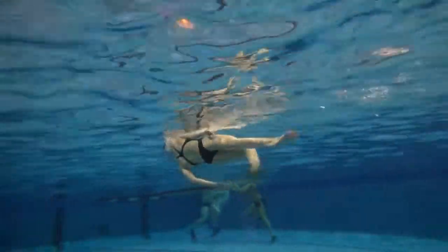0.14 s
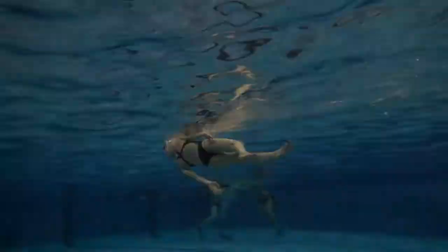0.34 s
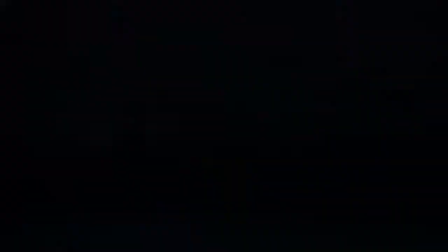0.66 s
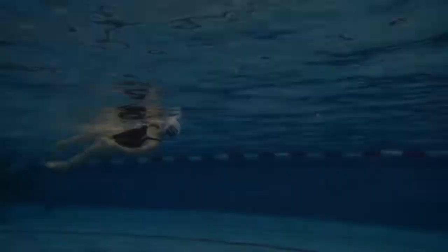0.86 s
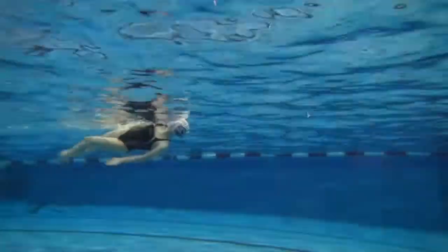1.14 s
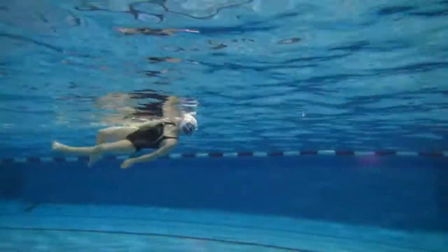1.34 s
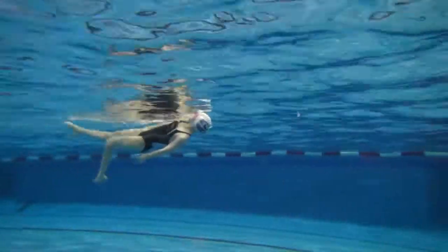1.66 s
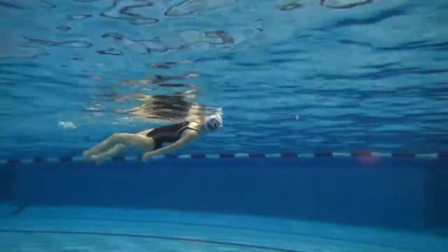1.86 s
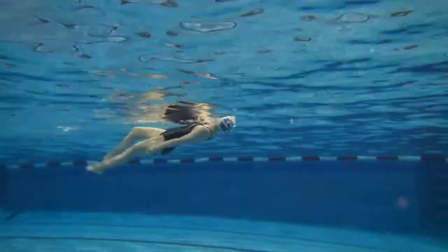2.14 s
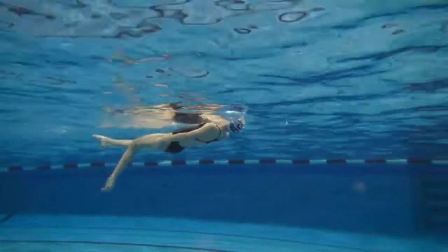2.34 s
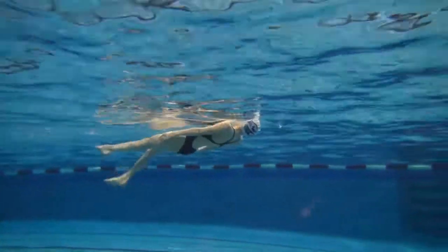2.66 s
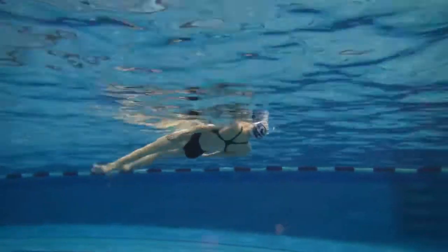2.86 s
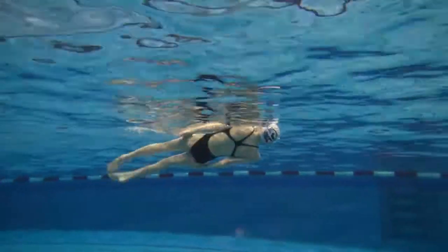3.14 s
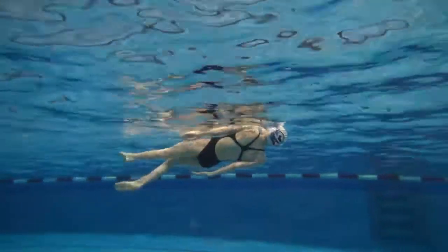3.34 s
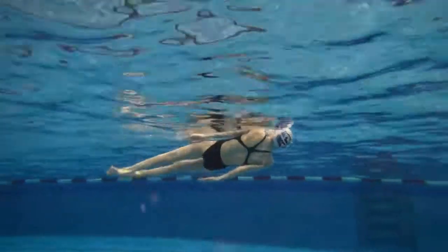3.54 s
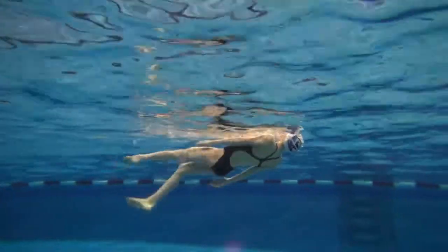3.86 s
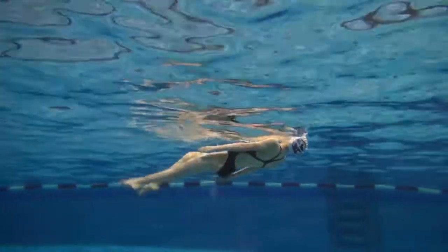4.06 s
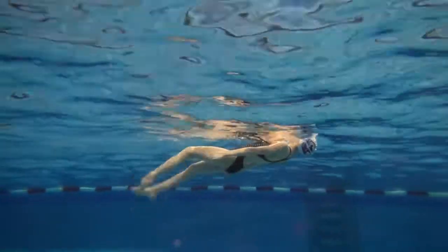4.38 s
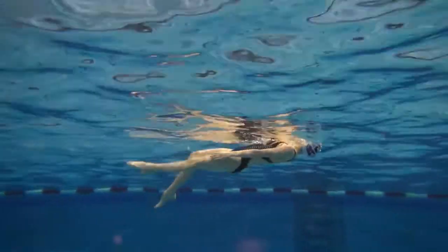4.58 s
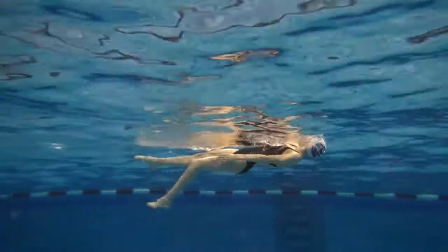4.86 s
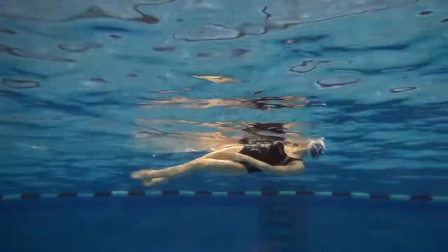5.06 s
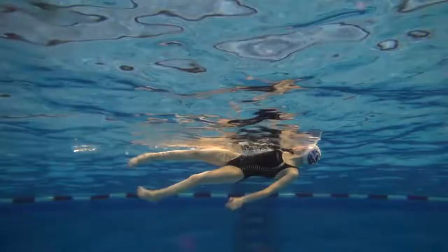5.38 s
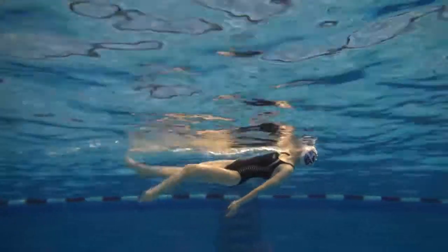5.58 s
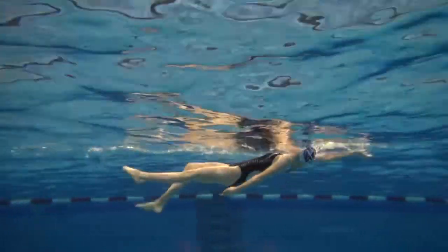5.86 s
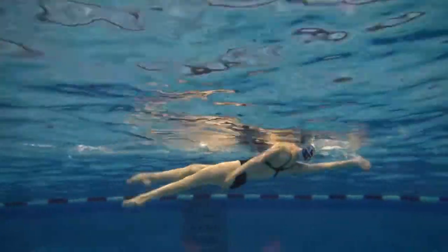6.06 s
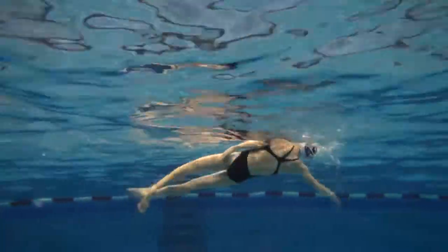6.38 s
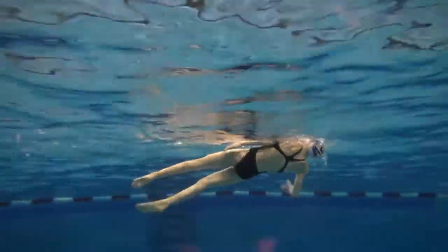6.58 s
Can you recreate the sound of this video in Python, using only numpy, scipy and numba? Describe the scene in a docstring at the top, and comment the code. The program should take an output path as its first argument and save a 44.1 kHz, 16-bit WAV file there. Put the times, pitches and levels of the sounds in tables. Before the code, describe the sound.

Close underwater gurgling and bubbling around a swimmer in a pool, with hollow plops, dull knocks, sharp crackling snaps and muffled splashes behind.

```python
"""Swimmer passing an underwater camera

In a pool, air pockets gulp close beside the housing as gliding, wavering sine notes. Ringing bubbles and noise churn
along its left side. Slaps push the case, ring the air they trap and burst into foam; the recorder snaps and crackles
on peaks. Behind lie shaped noise and droplets for the muffled splashing of kicks and hands, slow eddies and a faint
camera whine. The left microphone is nearer most sounds; a fast compressor and a limiter duck everything after peaks."""
import sys
import numpy as np
from scipy import signal
from scipy.fft import rfft, irfft, next_fast_len
from scipy.io import wavfile
from scipy.ndimage import uniform_filter1d, map_coordinates
from numba import njit

SR = 44100
rng = np.random.default_rng(int(sys.argv[2]) if len(sys.argv) > 2 else 0)


def digitize_waveform(pressure):
    """Quantize a signal to 16-bit integers and store it at the path in sys.argv[1].

    Rows of a 2-D input are taken as channels; values are limited to [-1, 1].
    """
    field = np.atleast_2d(pressure).T
    bounded = np.clip(field, -1, 1)
    quanta = np.round(bounded * 32767).astype(np.int16)
    wavfile.write(sys.argv[1], SR, quanta)


N = 295911  # length in samples

# Air pockets that ring beside the case. Each row: start in seconds, length in seconds, first pitch in Hz,
# last pitch in Hz, relative level in dB.
AIR_POCKETS = [(0, 0.0486, 348, 354, -31.5), (0, 0.046, 254, 255, -33), (0.194, .052, 361, 340, -24),
               (.447, .034, 437, 422, -22.5), (0.467, .1, 119.9, 98, -16.5), (.562, 0.08, 79, 67, -16.5),
               (0.588, .087, 448, 400, -26.5), (.66, .11, 81.2, 77.2, -24.5),
               (.715, 0.054, 349, 355, -10.5), (.72, 0.082, 260.4, 243.8, -11),
               (0.729, .15, 201, 201.7, -15.5), (0.814, 0.055, 401.5, 444, -16),
               (.865, .06, 403, 398, -18.5), (0.869, .06, 349, 339, -15), (0.904, .12, 311.7, 309.3, -20.5),
               (.915, 0.025, 747, 770, -12.5), (.94, .075, 215.5, 203, -9.5),
               (0.953, 0.077, 348.6, 356, -12.5), (1.012, .045, 187.5, 163.6, -10.5),
               (1.055, 0.044, 614, 586, -18.5), (1.06, 0.14, 158.3, 158.2, -12),
               (1.114, .06, 256.2, 265, -11), (1.12, .12, 365.4, 342, -17), (1.131, 0.071, 538, 532, -21.5),
               (1.137, 0.055, 857, 878, -27), (1.19, .12, 158.4, 154.3, -10), (1.187, .09, 243, 248, -9),
               (1.269, .06, 721, 690, -21.5), (1.279, .058, 260, 262, -1), (1.3, 0.11, 130.3, 134.6, -16.5),
               (1.37, .05, 718, 729, -19), (1.375, .1, 276, 269, -8), (1.41, .15, 183.1, 192.3, -13.5),
               (1.46, .14, 156.6, 150.6, -14.5), (1.47, .09, 269.7, 264.6, -15.5),
               (1.497, .12, 111, 121.7, -23.5), (1.54, .11, 237.8, 238.4, -11.5),
               (1.59, 0.12, 191.2, 195.3, -13), (1.6, .1, 149.9, 163.9, -11),
               (1.662, .065, 241.7, 251.7, -6.5), (1.69, 0.08, 160.1, 170.2, -20.5),
               (1.726, .078, 269.6, 261.7, -8), (1.829, 0.098, 259, 254.4, -11),
               (1.83, 0.14, 191, 210.5, -21), (1.95, .1, 393.4, 449.3, -20),
               (1.977, 0.087, 270, 277.7, -14.5), (2.0, .08, 221.4, 241.7, -14.5),
               (2.046, 0.22, 367, 370.2, -20.5), (2.058, .065, 255.4, 263.3, -6),
               (2.139, 0.042, 275, 290.6, -13), (2.233, 0.18, 345, 355, -23.5),
               (2.255, 0.053, 205.5, 201, -17), (2.455, 0.044, 208.7, 210.6, -13.5),
               (2.856, 0.055, 209.5, 218, -18), (2.926, .045, 252, 257, -13.5),
               (3.025, 0.053, 269.5, 268, -23), (3.13, 0.05, 306, 310, -17), (3.177, .07, 265, 272, -12.5),
               (3.358, 0.17, 652.3, 636, -28), (3.5, .05, 700, 660, -21), (3.38, .2, 146, 150.2, -26),
               (3.76, 0.14, 266.8, 270, -23.5), (3.85, .3, 148.4, 148.4, -25.5),
               (3.994, .1, 651.6, 670, -24.5), (4.024, .09, 270.6, 272, -16),
               (4.123, 0.045, 367.4, 384, -17.5), (4.202, .09, 695, 708, -18),
               (4.216, .11, 278.5, 264.5, -16.5), (4.358, .045, 268.4, 267, -18),
               (4.602, .115, 365, 352, -10.5), (4.64, .08, 207, 194.5, -11), (4.91, .11, 86, 107, -21),
               (5.161, .075, 282.6, 258, -20), (5.272, 0.045, 238, 265.4, 2),
               (5.988, .065, 693.4, 655, -16), (6.125, .04, 253, 257, -15), (6.48, 0.074, 853, 775, -19)]
POCKET_WAVER_OCT = .012  # unsteadiness of the pitch, in octaves
POCKET_EDGE_S = .014  # a pocket swells, and breaks off, within this time

# Bubbles streaming past the case. Each row: time in seconds, relative level of large bubbles in dB, of small ones in dB.
BUBBLE_FLOW = [(0, -75, -45), (.22, -53.5, -68), (.36, -40.5, -50.5), (.85, -31, -41.5), (1.22, -34, -37),
               (1.55, -39, -52), (1.75, -37.5, -50.5), (1.9, -34.5, -45), (2.15, -37.5, -46.5),
               (2.42, -35, -38.5), (3.05, -36, -35.5), (3.35, -39.5, -41.5), (4.15, -31, -36),
               (4.4, -35.5, -38.5), (4.65, -32, -31.5), (4.8, -35, -38), (4.87, -37, -38.5),
               (4.95, -34, -35.5), (5.6, -35, -34.5), (6.301, -38.5, -33), (6.71, -29.5, -33.5)]
LUMP_DB, LUMPS_PER_S = 1.5, 16  # the stream of bubbles is lumpy
# Colours of the large and the small bubbles through the case. Each row: frequency in Hz, relative gain in dB.
LARGE_COLOUR = [(70, -40.5), (125, -6), (155, -3.5), (180, -2.5), (215, 2.5), (238, -8), (268, 6.5),
                (305, -9.5), (335, 0), (366, 2.5), (410, -2), (510, -6), (700, -24), (1500, -100)]
SMALL_COLOUR = [(300, -25), (500, -16), (592, 2), (625, -17), (650, 2.5), (700, -1.5), (770, -1.5),
                (900, -16), (1060, -22.5), (1300, -30), (2000, -49.5), (3000, -47.5), (5000, -61),
                (12000, -105)]

# Water slapping the case. Each row: start in seconds, ring pitch in Hz, relative ring level in dB,
# relative push level in dB.
CASE_SLAPS = [(.404, 162.2, -27, -10.5), (.569, 242.3, -20.5, -14), (.595, 361, -20.5, -12.5),
              (.627, 402, -12, -11.5), (.663, 345.4, -13, -15), (.72, 549, -12.5, -9.5),
              (.73, 264, -8, -7.5), (.739, 329.6, -2.5, -12), (0.75, 343.5, -9.5, -13),
              (.778, 230, -7, -17.5), (.924, 751, -11.5, -13), (.978, 377, -9, -9), (1.058, 572, -7, -4.5),
              (1.135, 533, -16, -12.5), (1.297, 716, -14, -19.5), (1.373, 707, -11.5, -4.5),
              (1.423, 291, -6, -5), (1.68, 172.3, -16.5, -9.5), (1.821, 450, -13, -17),
              (1.87, 273.7, -11, -10), (2.087, 295, -7.5, -10.5), (2.242, 787, -17.5, -27.5),
              (2.297, 569, -11.5, -28.5), (2.699, 691, -8, -6), (2.795, 453, -2, -12.5),
              (3.001, 703, -14.5, -26), (3.107, 687, -17, -25), (3.184, 280.8, -2.5, -14.5),
              (3.587, 750, 4, -4.5), (3.648, 667, -9.5, -29), (3.948, 694, -10.5, -27),
              (4.112, 427, -15, -12.5), (4.485, 626, -7.5, -15.5), (4.594, 737, 12.5, 6.5),
              (4.631, 346.5, 4, -6.5), (4.651, 366.4, 0, -15.5), (4.81, 678, 9.5, 2.5),
              (4.817, 473.5, 2, 4), (4.823, 598, 2.5, 6), (4.908, 635, -11.5, -30), (4.99, 608, -4, -17),
              (5.088, 559, -9.5, -24), (5.271, 260, 8, 8.5), (5.351, 348, -9, -7.5),
              (5.433, 730, -24.5, -22.5), (5.449, 655, -13.5, -23), (5.544, 780, -11, -27),
              (5.576, 773, -3.5, -17), (5.601, 532, -6, -14.5), (5.833, 683, -9.5, -11.5),
              (5.941, 623, -4.5, -23.5), (6.055, 241.4, -14, -10.5), (6.207, 736, -11, -23),
              (6.389, 682, -3.5, -24.5), (6.461, 728, -6.5, -25), (6.54, 717, -7.5, -34.5),
              (6.6, 383, -6.5, -26.5)]
RING_CYCLES = 41  # cycles that the trapped air rings until it is 60 dB down
# Bubbles that split off the trapped air: level of each over the ring, spread of pitch in octaves, spread of delay.
SPLINTER_DB, SPLINTER_OCT, SPLINTER_S = -8, .3, .005
RUSH_DB, RUSH_S = -16.5, 0.0064  # water rushes in just before a slap: level over the foam burst, rise time
# Colour of the foam in a slap. Each row: frequency in Hz, relative gain in dB.
FOAM_COLOUR = [(100, -3), (350, 3.5), (750, 4), (1100, 0), (1500, -12), (2500, -26), (4000, -37.5),
               (8000, -54), (15000, -78)]
# The case muffles the ring of trapped air. Each row: frequency in Hz, gain in dB.
CASE_MUFFLING = [(100, 0.5), (800, 0), (1100, -1.5), (1500, -17.5), (4000, -31.5)]

# Sharp dry clicks as the recorder's limiter grabs loud peaks, often several to a slap. Each row: time in seconds,
# relative level in dB, brightness in dB per octave.
RECORDER_SNAPS = [(.401, -25, 0), (0.4059, -13, 3), (.569, -28.5, 2.5), (.595, -30, -1), (0.628, -26, 1.5),
                  (.663, -28.5, 0), (0.7219, -25.5, -3), (.726, -19.5, 0.5), (.731, -16.5, 2),
                  (.7395, -8, 0), (0.743, -21, -2), (0.747, -23.5, -0.5), (.753, -23, 0), (.778, -19, -5.5),
                  (.792, -24, 4.5), (0.795, -27, 4), (0.9265, -16.5, -1), (0.931, -24, 0), (.937, -24, -3),
                  (.979, -24.5, 0), (1.053, -25.5, 6.5), (1.0586, -20, 1.5), (1.063, -22.5, -2),
                  (1.133, -23.5, 2), (1.138, -23, 1.5), (1.297, -18, -1), (1.3736, -11.5, -1.5),
                  (1.385, -28.5, -4), (1.4225, -17.5, 0), (1.425, -24.5, 3), (1.822, -26, -2.5),
                  (1.8724, -19, -4.5), (2.018, -28.5, 0), (2.0889, -21, 0.5), (2.696, -26, 2.5),
                  (2.701, -15, -2.5), (2.702, -22.5, -0.5), (2.793, -29, -0.5), (2.803, -25, -2.5),
                  (3.036, -20, -4.5), (3.186, -17.5, -0.5), (3.199, -26.5, 3), (3.582, -24, 3.5),
                  (3.5863, -15, -0.5), (3.589, -6, 2.5), (3.595, -20.5, -3), (3.954, -29.5, 3),
                  (4.113, -21.5, -3.5), (4.144, -32.5, 0), (4.164, -26, -5.5), (4.235, -26.5, -2),
                  (4.271, -27.5, 0.5), (4.493, -22, 3), (4.589, -30.5, 7.5), (4.596, -1, 1),
                  (4.5965, 6.5, -5), (4.598, 8, -3.5), (4.599, 2, -1.5), (4.627, -24.5, 7),
                  (4.63, -4.5, -3.5), (4.636, -20, -0.5), (4.65, -14, -4), (4.663, -17.5, 1),
                  (4.809, -20, -3), (4.8128, -11.5, 3.5), (4.815, -9, 0), (4.8252, -12, 1.5),
                  (4.826, -14.5, -1.5), (4.989, -25, 0.5), (4.99, -26.5, 2), (5.204, -29.5, 0.5),
                  (5.267, -25.5, 2.5), (5.268, -20, -0.5), (5.272, 8.5, 0), (5.351, -31, -4.5),
                  (5.435, -20.5, -9), (5.575, -17, -4.5), (5.597, -21, 5.5), (5.602, -22.5, 3.5),
                  (5.847, -23.5, -4.5), (5.944, -18.5, -1.5), (5.949, -21, -2.5), (6.056, -19, 6),
                  (6.391, -19.5, 1), (6.533, -28, 3.5), (6.6, -18.5, -1), (6.618, -24, -1)]
SNAP_S, SNAP_PIVOT_HZ = .00019, 4000  # time constant; the pitch about which the brightness tilts
# Colour of a snap. Each row: frequency in Hz, relative gain in dB.
SNAP_COLOUR = [(300, -7.5), (1200, 13.5), (2500, 5), (4000, -4.5), (6000, -11), (9000, -17), (15000, -28)]

# Spans where the recorder's compressor ticks on more pressure crests. Each row: start in seconds, length in seconds,
# share of the crests that tick.
TICK_SPANS = [(0.83, .26, .4), (1.112, 0.19, .6), (1.505, .2, .35), (1.732, 0.051, .6), (1.95, 0.24, .35),
              (4.099, .22, .3), (4.61, .1, .7)]
CALM_SHARE = 0.18  # share of the crests that tick between these spans
TICK_DB, TICK_SPREAD_DB = -24, 3  # relative level of the ticks and its random spread
CREST_LIMIT = 0.19  # crest of pressure at which the ticks stop growing
# Colour of a fine dry tick. Each row: frequency in Hz, relative gain in dB.
TICK_COLOUR = [(500, -15), (1300, -2), (2500, -6), (4000, -12.5), (6000, -18), (9000, -25), (15000, -45.5)]

# Kicks and hands breaking the surface. Each row: time of the crest in seconds, relative level in dB.
SURFACE_SPLASHES = [(2.343, -41.5), (2.596, -37), (2.801, -28), (2.995, -34.5), (3.13, -38.5), (3.197, -36),
                    (3.489, -32.5), (3.649, -38), (3.794, -43.5), (3.872, -34), (3.95, -31.5),
                    (4.059, -39.5), (4.165, -38.5), (4.259, -37), (4.364, -37.5), (4.44, -39), (4.51, -34),
                    (4.969, -36.5), (5.18, -41.5), (5.559, -39.0), (5.732, -35.5), (5.858, -36.5),
                    (6.048, -44), (6.112, -42.5), (6.212, -31.5), (6.311, -35.5), (6.45, -39),
                    (6.535, -43.5), (6.601, -32.5), (6.661, -38.5)]
SPLASH_RISE_S, SPLASH_FALL_S = 0.0099, 0.012  # a splash swells and sinks
# Colour of a splash. Each row: frequency in Hz, relative gain in dB.
SPLASH_COLOUR = [(300, -24), (700, -6), (900, -2.5), (1070, 11), (1200, -6), (1400, -26.5), (2000, -22.5),
                 (2800, -38.5), (6000, -64.5)]

# Broken water at the surface. Each row: time in seconds, relative wash level in dB, relative spray level in dB.
SURFACE_WATER = [(0, -54, -66.5), (.4, -54, -67), (.95, -54, -68.5), (1.4, -60.5, -86.5), (1.8, -59, -78.5),
                 (2.05, -52, -70.5), (2.55, -47, -63.5), (2.85, -38, -65), (3.3, -46, -67.5),
                 (3.9, -44.5, -64.5), (4.55, -42, -59.5), (4.8, -40.5, -61.5), (4.85, -50, -71),
                 (4.9, -40.5, -59.5), (5.3, -46, -61.5), (5.85, -43, -58.5), (6.3, -42.5, -63.5),
                 (6.71, -43.5, -59)]
SURGE_DB, SURGES_PER_S = 2, 22  # the wash comes in quick uneven surges
SPRAY_SURGE_DB, SPRAY_SURGES_PER_S = 2, 18  # the spray flutters more slowly
FIZZ_DB, FIZZ_SPREAD_DB = -4, 5.5  # droplets within the spray: relative level, spread of strength
# Colours of the wash at the left and right microphone, of the spray and of its droplets.
# Each row: frequency in Hz, relative gain in dB.
WASH_LEFT_COLOUR = [(25, 7), (90, -14), (125, -3), (148, 12), (180, -4), (212, 6), (238, -2.5), (268, 7),
                    (305, -3.5), (366, 0), (410, -2.5), (465, -0.5), (505, -6), (590, -3.5), (700, -2),
                    (800, -11.5), (1080, -5), (1400, -48.5), (2500, -59.5), (6000, -100)]
WASH_RIGHT_COLOUR = [(25, 0.5), (110, -1.5), (260, 2.5), (305, -17.5), (355, 6), (460, -19), (700, -1.5),
                     (900, -16.5), (1070, 5.5), (1180, -7), (1350, -27), (2500, -37.5), (6000, -100)]
SPRAY_COLOUR = [(600, -21.5), (1300, 6), (1620, -2), (1800, -2), (2000, 0), (2400, -13), (2750, -9),
                (3350, -17.5), (3700, -19.5), (5000, -25.5), (7500, -32.5), (9000, -41), (15500, -55)]
FIZZ_COLOUR = [(500, -12), (1300, 6.5), (2500, -4.5), (4000, -10.5), (6000, -25.5), (9000, -28.5),
               (15000, -37)]

# Sheets of spray thrown by arms and feet. Each row: start in seconds, length in seconds, centre in Hz, width in Hz,
# relative level in dB.
SPRAY_SHEETS = [(0, 0.87, 850, 620, -47.5), (0, 0.22, 1893, 1100, -58), (0, 1, 2840, 800, -73.5),
                (0.072, 0.14, 1480, 420, -57), (0.202, 0.66, 1840, 996, -59.5),
                (2.538, 0.054, 2410, 2580, -58.5), (4.432, 0.029, 2500, 2410, -49),
                (4.46, 0.033, 2200, 1770, -49.5), (5.68, 1.0, 1580, 170, -53.5)]

# Slow eddies against the case. Each row: time in seconds, relative rumble level in dB.
EDDY_RUMBLE = [(0, -53), (.2, -61), (.45, -44.5), (1.35, -47), (1.65, -56), (2.25, -61), (2.7, -43.5),
               (3.7, -46.5), (4.4, -46.5), (5.2, -44.5), (5.9, -47.5), (6.4, -45), (6.71, -59)]
EDDY_SWELL_DB, EDDY_SWELLS_PER_S = 5, 5.6  # the rumble swells and sinks
WAKE_DB, WAKE_S = -34.5, 0.0076  # eddy left by a slap: level over its push, time to die away
# Colour of the rumble through the case. Each row: frequency in Hz, relative gain in dB.
RUMBLE_COLOUR = [(12, -6.5), (30, 10), (60, 5), (100, 5), (150, -17), (300, -57.5), (600, -120)]

# Faint whine of the camera. Each row: time in seconds, lower pitch in Hz, upper pitch in Hz.
CAMERA_WHINE = [(0, 7800, 11070), (.65, 7800, 11000), (.9, 7600, 11680), (1.7, 7500, 11700),
                (2.1, 7500, 11300), (6.71, 7250, 11230)]
WHINE_DB, WHINE_WAVER_HZ = -97, 55  # level of each tone, unsteadiness of its pitch
FLOOR_DB = -83.5  # hiss of the camera

# Colour of both microphones. Each row: frequency in Hz, gain in dB.
MICROPHONE_COLOUR = [(20, -6), (2500, 0.5), (5000, 0), (9000, 0), (15000, 4)]
TOP_HZ = 15800  # nothing passes above this
LIMIT_DB = -11  # threshold of the limiter
FADE_S = .004  # fade at both ends


def gulps():
    """Each large air pocket swells into a low, slightly unsteady note and breaks off."""
    out = np.zeros(N)
    for s, length, first_hz, last_hz, db in AIR_POCKETS:
        u = np.linspace(0, 1, int(length * SR))
        glide = first_hz + (last_hz - first_hz) * u
        pitch = glide * 2 ** (POCKET_WAVER_OCT * wobble(56, len(u)))
        edge = np.minimum(np.minimum(u, 1 - u) * length / POCKET_EDGE_S, 1)
        swell = np.sin(np.pi / 2 * edge) ** 2 * amp(db + 1.8 * wobble(27, len(u)))
        add(out, s, swell * np.sin(2 * np.pi * np.cumsum(pitch) / SR))
    return from_left(amp(-4.5) * out, right_db=-15.5)


def churn():
    """Bubbles of two sizes, ringing amid noise, stream along the left side of the case."""
    large_db, small_db = [db + LUMP_DB * wobble(LUMPS_PER_S, N) for db in curves(BUBBLE_FLOW)]
    large = bubbles(121.2, 543, cycles=36, spread_db=-1.0, rise=0.054, count=2000)
    large = coloured(large + 0.1 * rng.standard_normal(N), LARGE_COLOUR)
    small = bubbles(457, 1396, cycles=63, spread_db=2.0, rise=0.012, count=2400)
    small = coloured(small + 1.7 * rng.standard_normal(N), SMALL_COLOUR)
    large_stream = from_left(amp(large_db + 9.5) * large, right_db=-18.5)
    small_stream = from_left(amp(small_db + 8) * small, right_db=-27.5)
    return large_stream + small_stream


def bubbles(low_hz, high_hz, cycles, spread_db, rise, count):
    """A cloud of bubbles: each rings for some cycles while its pitch rises."""
    when, pitch, size, life = rng.random((count, 4)).T[:, :, None]
    t = np.arange(SR // 16) / SR
    hz = low_hz * (high_hz / low_hz) ** pitch
    age = t * hz / (cycles * (.5 + life))
    phase = 2 * np.pi * hz * t * (1 + rise * np.minimum(age, 1))
    ring = np.sin(phase) * amp(-60 * age) * (1 - np.exp(-2 * hz * t))
    strength = amp(-spread_db * np.log(1 - .97 * size)) * np.sqrt(hz)
    ring *= strength * (1 - t / t[-1])
    at = (when * N).astype(int) + np.arange(len(t))
    return unit(np.bincount(at.ravel(), ring.ravel(), N)[:N])


def slaps():
    """A slap is a soft push on the whole case, the ring of the air it traps and splinters, and a ragged foam burst."""
    rings, pushes, foam = np.zeros((3, N))
    t = np.arange(SR // 6) / SR
    before = t[:SR // 20]
    for s, hz, ring_db, push_db in CASE_SLAPS:
        splinters = np.zeros(len(t))
        for delay, pitch in rng.standard_normal((4, 2)):
            splinters += trapped_air(t - SPLINTER_S * abs(delay), hz * 2 ** (SPLINTER_OCT * pitch))
        add(rings, s, amp(ring_db) * (trapped_air(t, hz) + amp(SPLINTER_DB) * splinters))
        fall = amp(ring_db - 60 * t * hz / RING_CYCLES) * np.exp(-t / 0.025)
        add(foam, s, fall * (1 - np.exp(-t / 0.00015)))
        rush = amp(ring_db + RUSH_DB) * np.exp(-before[::-1] / RUSH_S)
        add(foam, max(s - before[-1], 0), rush)
        u = t / 0.00056
        add(pushes, s, amp(push_db) * u * u * (3 - u) * np.exp(-u))
    foam_noise = coloured(rng.standard_normal((2, N)), FOAM_COLOUR)
    burst = amp(-20.0) * foam * foam_noise * amp([[0], [-6]])
    muffled = filtered(rings, lambda hz: along(CASE_MUFFLING, hz))
    return from_left(amp(-5.0) * muffled, right_db=-24.0) + from_left(pushes, right_db=-8.0) + burst


def trapped_air(t, hz):
    """A trapped bubble of strength 1 rings from t = 0 on and dies away over a set number of cycles."""
    t = np.maximum(t, 0)
    return amp(-60 * t * hz / RING_CYCLES) * (1 - np.exp(-t / 0.00029)) * np.sin(2 * np.pi * hz * t)


def recorder_snaps():
    """Each grab of the recorder's limiter is a very short ragged crack of noise, with a colour of its own."""
    out, size = np.zeros(N), SR // 80
    t, hz = np.arange(size) / SR, np.fft.rfftfreq(size, 1 / SR)
    age = np.maximum(t - t[-1] / 2, 0) / SNAP_S
    octaves = np.log2(np.maximum(hz, SNAP_PIVOT_HZ / 4) / SNAP_PIVOT_HZ)
    for s, db, brightness in RECORDER_SNAPS:
        crack = rng.standard_normal(size) * age * np.exp(-age)
        colour = along(SNAP_COLOUR, hz) * amp(db + brightness * octaves)
        add(out, s - t[-1] / 2, irfft(rfft(crack / np.linalg.norm(crack)) * colour, size))
    return from_left(out, right_db=-23.0)


def recorder_ticks(water):
    """Some pressure crests make the recorder's compressor tick: fine dry ticks with silence between them."""
    crests = signal.find_peaks(water[0], distance=SR // 400)[0]
    spread_db = TICK_SPREAD_DB * np.clip(rng.standard_normal(N), -2, 2)
    strength = (rng.random(N) < tick_chance()) * amp(TICK_DB + spread_db)
    ticks = np.zeros(N)
    ticks[crests] = np.clip(water[0, crests] / CREST_LIMIT, 0, 1) ** 2 * strength[crests]
    return from_left(filtered(ticks, lambda hz: along(TICK_COLOUR, hz)), right_db=-25.5)


def tick_chance():
    """Chance that a crest of pressure makes a tick, set anew within each of the listed spans."""
    chance = np.full(N, CALM_SHARE)
    for s, length, share in TICK_SPANS:
        chance[round(s * SR):round((s + length) * SR)] = share
    return chance


def splashes():
    """Kicks and hands slap the surface: short dull bursts of droplets, a little different at each microphone."""
    t, level = np.arange(N) / SR, np.zeros(N)
    for s, db in SURFACE_SPLASHES:
        level += amp(db) * np.exp(-((t - s) / np.where(t < s, SPLASH_RISE_S, SPLASH_FALL_S)) ** 2)
    shared, own = coloured(droplets(spread_db=0.5, count=8000), SPLASH_COLOUR)
    return level * np.array([shared + own, amp(3.0) * shared])


def splashing():
    """Broken water above: a dull wash, coloured apart at each microphone, and a patchy hiss of spray with droplets."""
    wash_db, spray_db = curves(SURFACE_WATER)
    shared, own = rng.standard_normal((2, N))
    left = amp(10.0) * coloured(shared + 1.4 * own, WASH_LEFT_COLOUR)
    right = amp(4.5) * coloured(shared, WASH_RIGHT_COLOUR)
    wash = amp(wash_db + SURGE_DB * wobble(SURGES_PER_S, N)) * np.array([left, right])
    patter = patchy(droplets(spread_db=5.0, count=5000), depth_db=3.5)
    hiss = amp(8.5) * coloured(patter, SPRAY_COLOUR)
    fizz = coloured(clicks(FIZZ_SPREAD_DB, count=900), FIZZ_COLOUR)
    fizz = amp(FIZZ_DB) * from_left(fizz, right_db=-10.5)
    spray_level = amp(spray_db + SPRAY_SURGE_DB * wobble(SPRAY_SURGES_PER_S, N))
    return wash + spray_level * (hiss + fizz) * amp([[0], [-9]])


def sheets():
    """Thrown spray lands as a band of pattering hiss that swells and sinks."""
    out = np.zeros((2, N))
    patter = droplets(spread_db=8.0, count=7000)
    for s, length, centre_hz, width_hz, db in SPRAY_SHEETS:
        count = int(length * SR)
        hz = np.fft.rfftfreq(count, 1 / SR)
        response = 1 / (1 + (2 * (hz - centre_hz) / width_hz) ** 2) ** 2
        band = irfft(rfft(patter[:, round(s * SR):], count) * response, count)
        swell = np.abs(np.sin(np.pi * np.linspace(0, 1, count) ** 0.54)) ** 0.49
        add(out, s, amp(db) * unit(band) * swell)
    return out * amp([[-1], [1]])


def eddies():
    """Turbulence presses on the case, partly on both microphones at once; every slap leaves a short wake."""
    level_db = curves(EDDY_RUMBLE)[0]
    level = amp(level_db + EDDY_SWELL_DB * wobble(EDDY_SWELLS_PER_S, N))
    u = np.arange(SR // 2) / SR / WAKE_S
    for s, _, _, push_db in CASE_SLAPS:
        add(level, s, amp(push_db + WAKE_DB) * np.sqrt(u) * np.exp(-u))
    shared, own = coloured(rng.standard_normal((2, N)), RUMBLE_COLOUR)
    return amp(12) * level * (from_left(shared, right_db=-18.5) + np.outer([0, amp(-7.5)], own))


def camera():
    """The electronics hiss and whine very faintly: shaped noise and two wavering tones."""
    pitches = [hz + WHINE_WAVER_HZ * wobble(300, N) for hz in curves(CAMERA_WHINE)]
    whine = amp(WHINE_DB) * sum(np.sin(2 * np.pi * np.cumsum(hz) / SR) for hz in pitches)
    # Each pair: frequency in Hz, relative gain in dB.
    hiss_colour = [(2000, -2.5), (7500, 0), (9500, -7.5), (11500, -3.5), (12800, -17), (15000, -23.5)]
    return whine + amp(FLOOR_DB) * coloured(rng.standard_normal((2, N)), hiss_colour)


def clicks(spread_db, count):
    """Single clicks at random moments: many faint, a few strong."""
    when, size, sign = rng.random((count, 3)).T
    gain = amp(-spread_db * np.log(1 - .96 * size))
    return np.bincount((when * N).astype(int), np.sign(sign - .5) * gain, N)


def droplets(spread_db, count):
    """Stereo patter of dense clicks over a little noise."""
    patter = np.array([unit(clicks(spread_db, count)) for _ in range(2)])
    return patter + .6 * rng.standard_normal((2, N))


def patchy(x, depth_db):
    """A sound with random patches of gain, a few hundred Hz wide and a tenth of a second long."""
    z = signal.stft(x, nperseg=512)[2]
    field = uniform_filter1d(rng.standard_normal(z.shape[1:]), size=5, axis=0)
    field = uniform_filter1d(field, size=16, axis=1)
    return signal.istft(z * amp(depth_db * unit(field)), nperseg=512)[1][:, :N]


def from_left(x, right_db):
    """A sound nearer the left microphone reaches the right one weakly."""
    return np.array([x, amp(right_db) * x])


def amp(db):
    """Decibels to gain."""
    return 10 ** (np.asarray(db) / 20)


def unit(x):
    """Scale to rms 1."""
    return x / np.sqrt(np.mean(x ** 2) + 1e-20)


def curves(rows):
    """One value per sample for each column after the time."""
    s, *cols = np.transpose(rows)
    return [np.interp(np.arange(N) / SR, s, c) for c in cols]


def wobble(rate, size):
    """A smooth random curve, rate knots a second."""
    return map_coordinates(rng.standard_normal(int(size * rate / SR) + 4), [np.arange(size) * rate / SR])


def along(points, hz):
    """Gain of (Hz, dB) points, read on a log axis."""
    f, db = np.transpose(points)
    return amp(np.interp(np.log(hz + 1), np.log(f), db))


def filtered(x, response):
    """x times a response of frequency."""
    m = next_fast_len(N + SR // 2)
    return irfft(rfft(x, m) * response(np.fft.rfftfreq(m, 1 / SR)), m)[..., :N]


def coloured(x, spectrum):
    """x shaped by a spectrum, at rms 1."""
    return unit(filtered(x, lambda hz: along(spectrum, hz)))


def add(track, s, sound):
    """Mix a sound into a track at time s."""
    part = track[..., round(s * SR):][..., :sound.shape[-1]]
    part += sound[..., :part.shape[-1]]


@njit
def follow(level, attack, hold, release):
    """Peak follower; times in samples."""
    out, peak, wait = np.zeros(len(level)), 0.0, 0.0
    for i in range(len(level)):
        wait -= 1
        if level[i] > peak:
            peak += (level[i] - peak) / attack
            wait = hold
        elif wait < 0:
            peak -= peak / release
        out[i] = peak
    return out


def compressed(x, threshold_db, slope, attack, hold, release):
    """Both channels are turned down together while the followed peak is over the threshold; times in seconds."""
    peak = follow(np.abs(x).max(axis=0), max(attack * SR, 1.0), hold * SR, release * SR)
    return x * np.maximum(peak / amp(threshold_db), 1) ** -min(slope, 1)


def scene():
    """The water at the two microphones, with the recorder's snaps and ticks and the camera's own noise."""
    water = gulps() + churn() + slaps()
    close = water + recorder_snaps() + recorder_ticks(water)
    surface = splashes() + splashing() + sheets()
    return close + surface + eddies() + camera()


def record(dry):
    """Fast compressor, limiter that hushes all after the hardest slaps, soft ceiling, microphone colour, band limit."""
    x = compressed(dry, threshold_db=-14.5, slope=0.35, attack=0.000082, hold=0.012, release=0.051)
    x = compressed(x, threshold_db=LIMIT_DB, slope=.55, attack=0.00018, hold=0.014, release=0.023)
    x = x / (1 + (x / .35) ** 8) ** (1 / 8)  # soft ceiling
    ends = np.minimum(np.minimum(np.arange(N), np.arange(N)[::-1]) / (FADE_S * SR), 1)
    return filtered(x * ends, lambda hz: along(MICROPHONE_COLOUR, hz) * (hz < TOP_HZ))


dry = scene()
out = record(dry)
digitize_waveform(out)
```